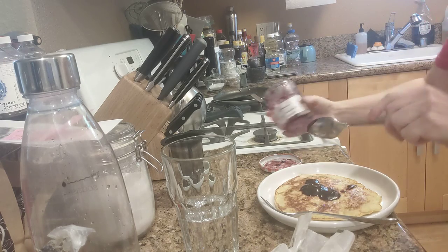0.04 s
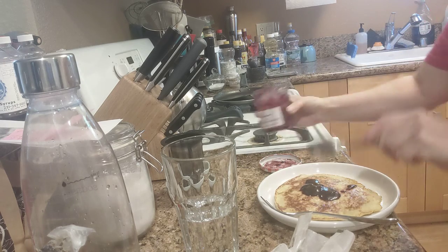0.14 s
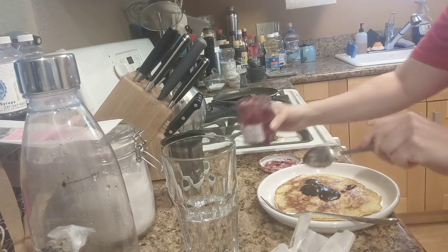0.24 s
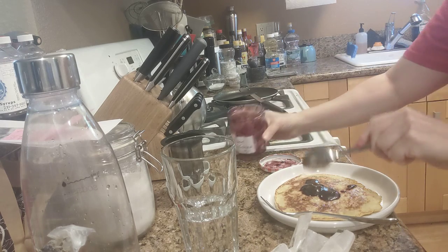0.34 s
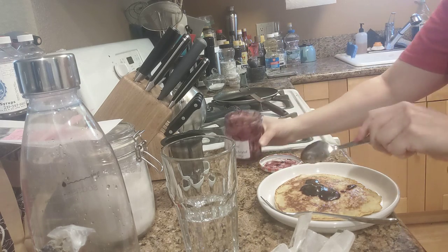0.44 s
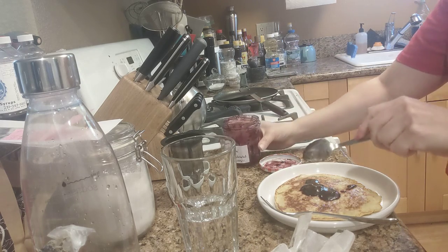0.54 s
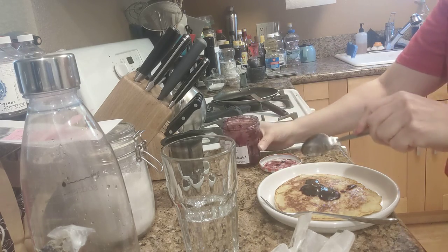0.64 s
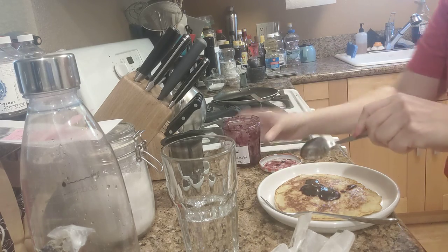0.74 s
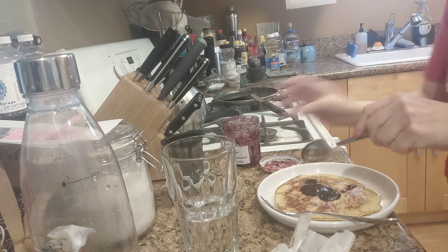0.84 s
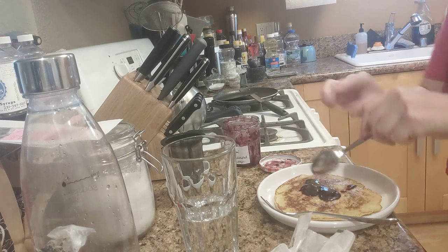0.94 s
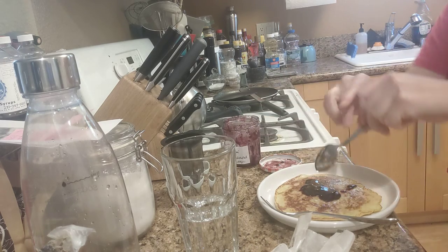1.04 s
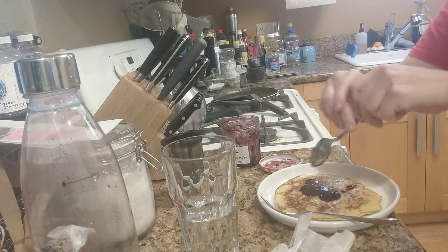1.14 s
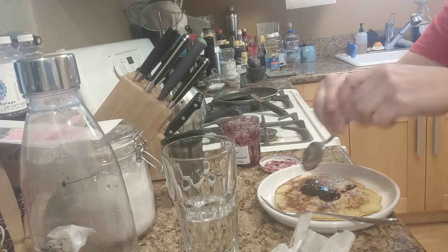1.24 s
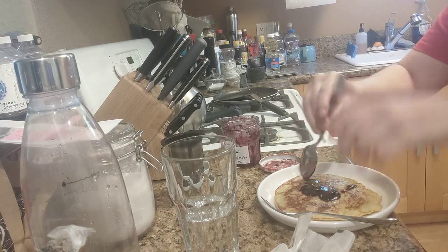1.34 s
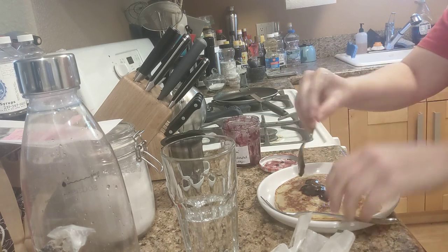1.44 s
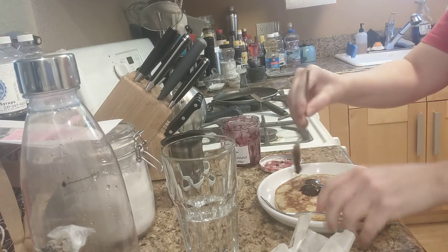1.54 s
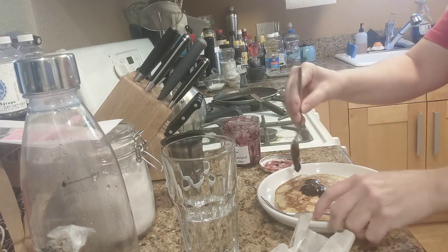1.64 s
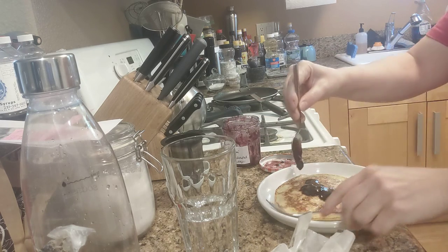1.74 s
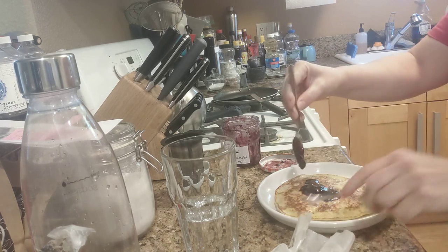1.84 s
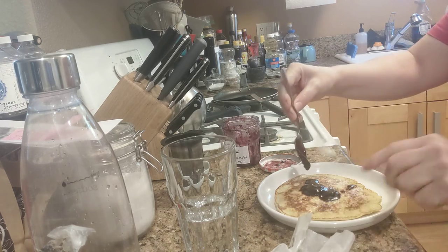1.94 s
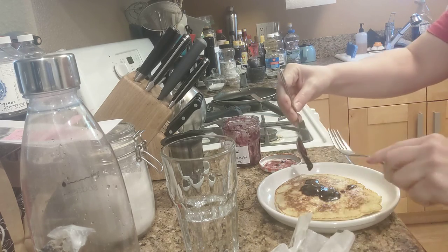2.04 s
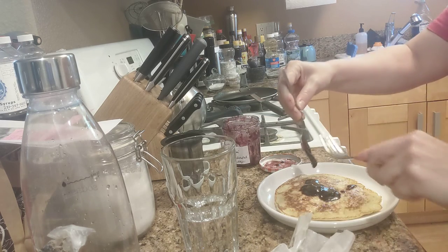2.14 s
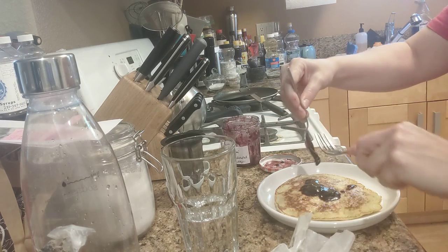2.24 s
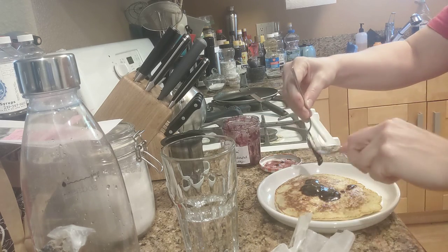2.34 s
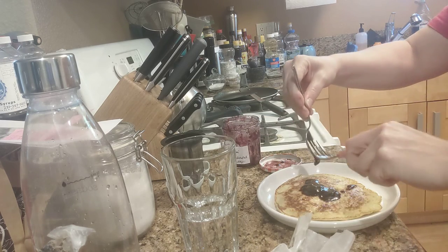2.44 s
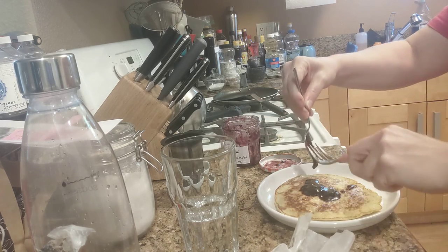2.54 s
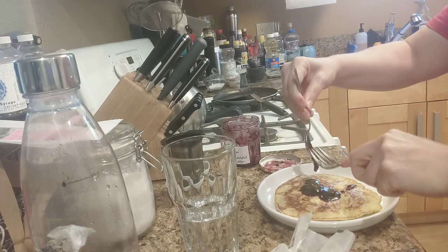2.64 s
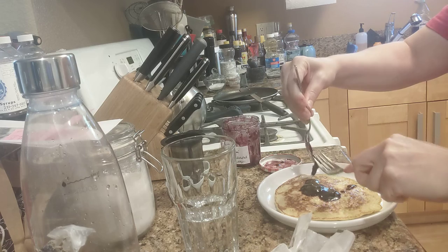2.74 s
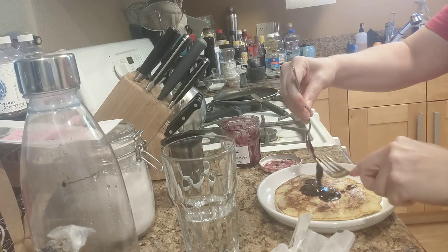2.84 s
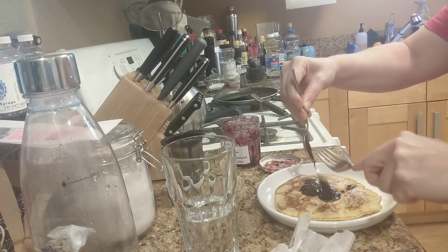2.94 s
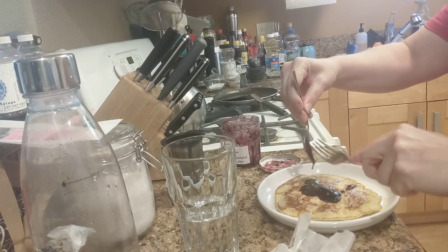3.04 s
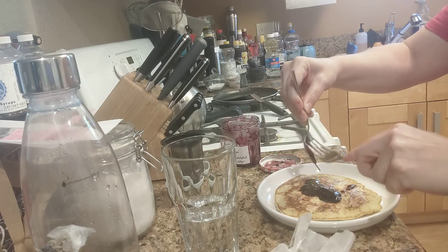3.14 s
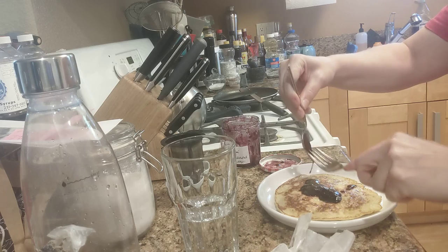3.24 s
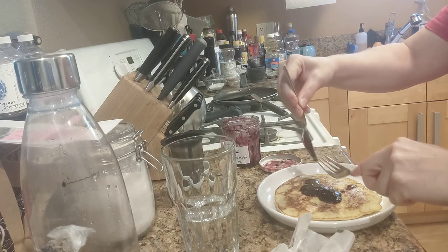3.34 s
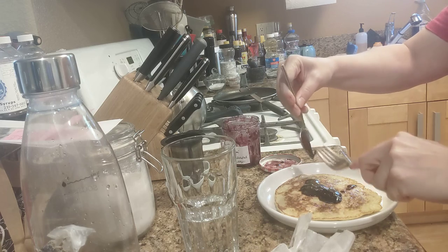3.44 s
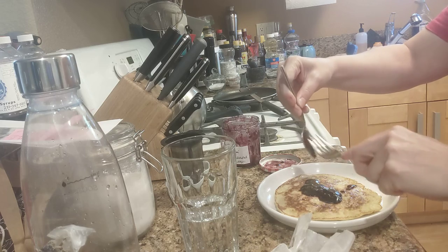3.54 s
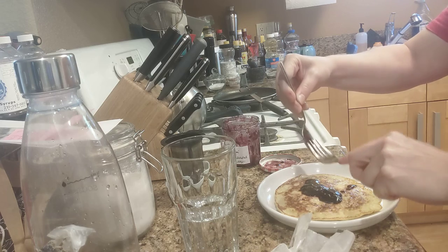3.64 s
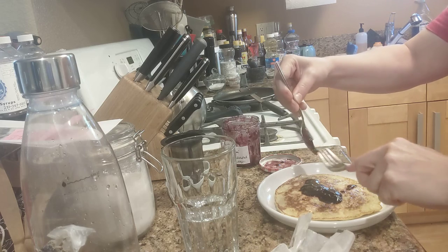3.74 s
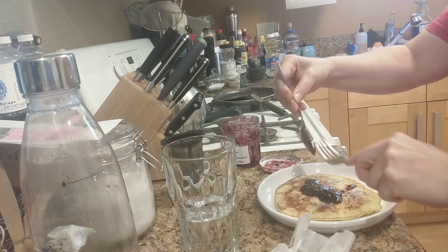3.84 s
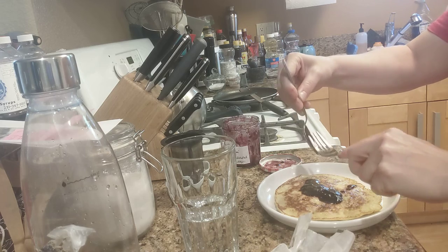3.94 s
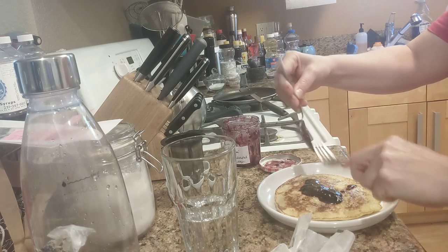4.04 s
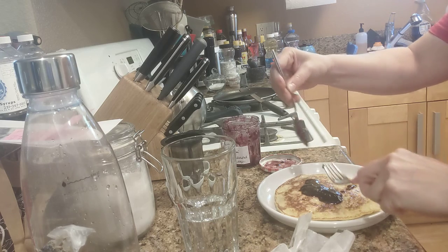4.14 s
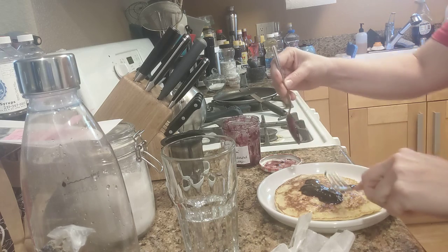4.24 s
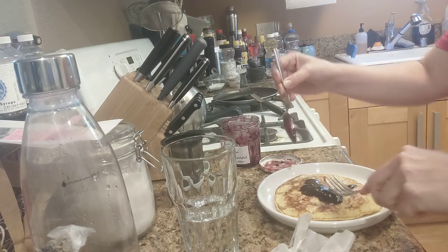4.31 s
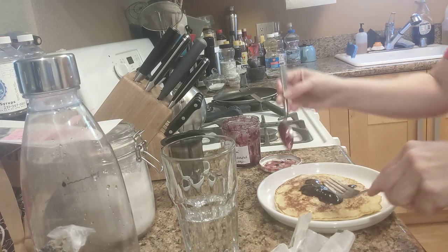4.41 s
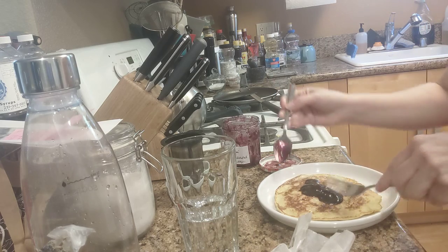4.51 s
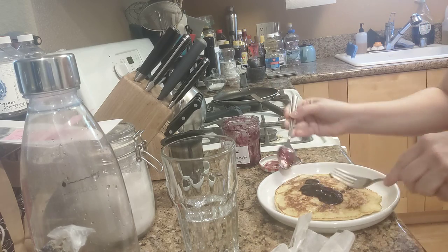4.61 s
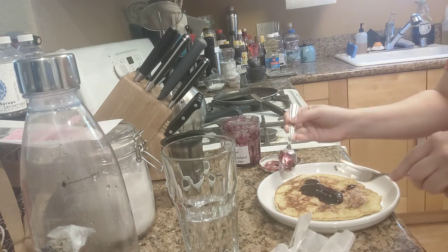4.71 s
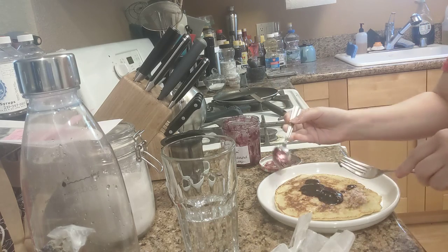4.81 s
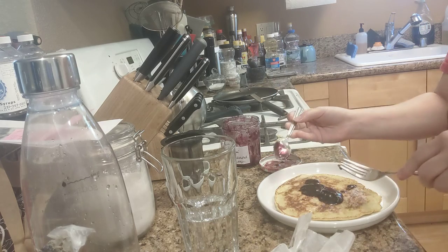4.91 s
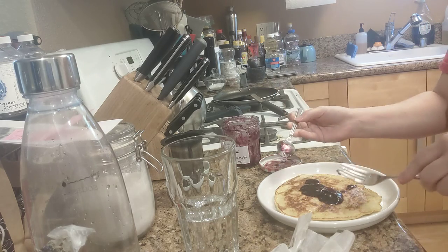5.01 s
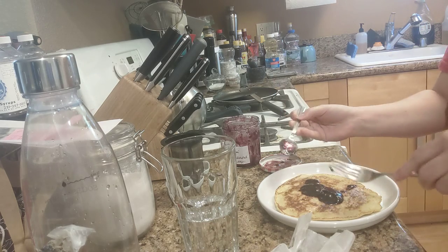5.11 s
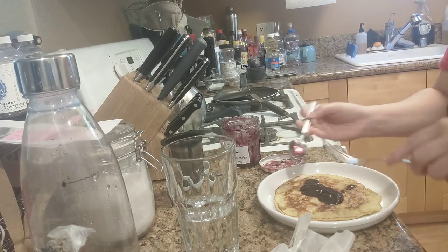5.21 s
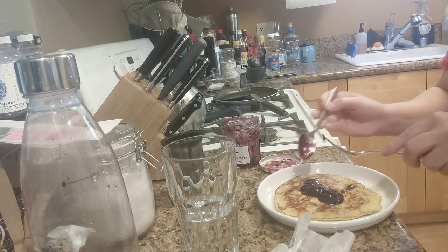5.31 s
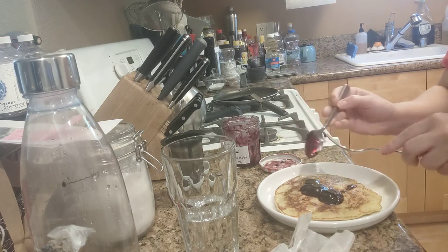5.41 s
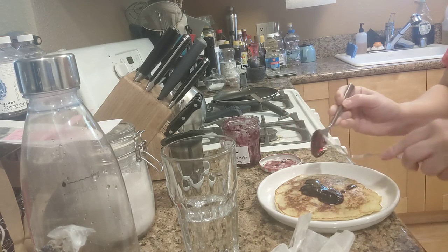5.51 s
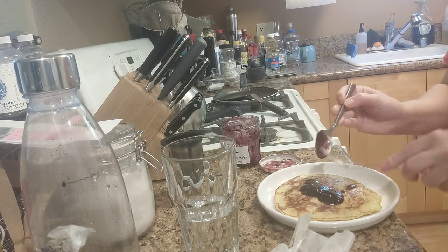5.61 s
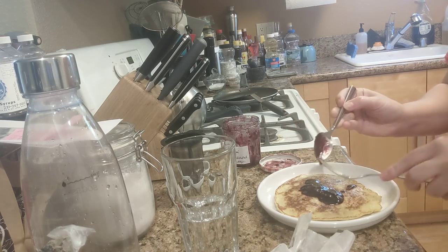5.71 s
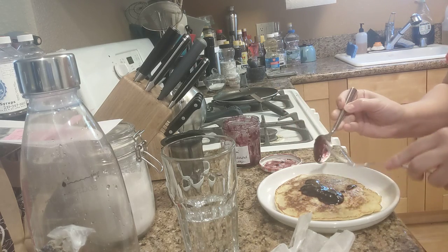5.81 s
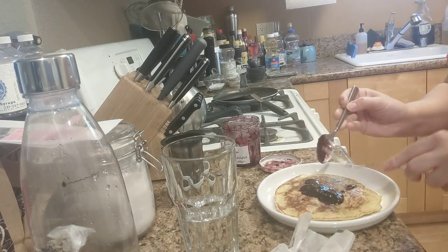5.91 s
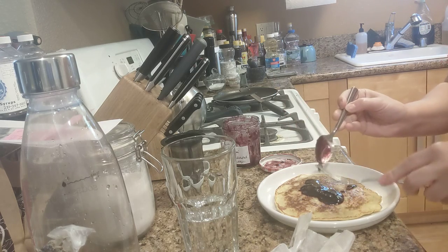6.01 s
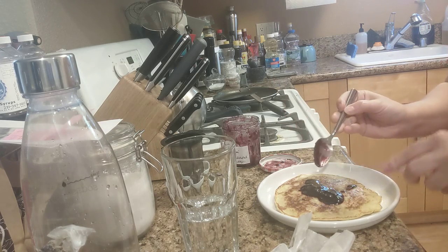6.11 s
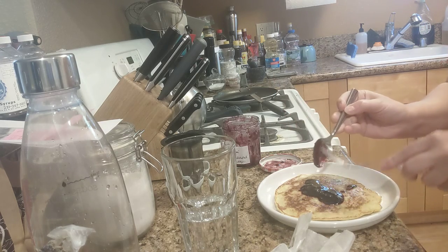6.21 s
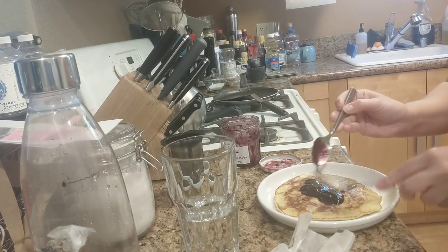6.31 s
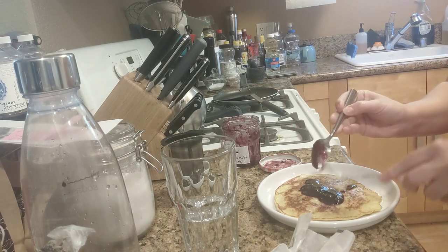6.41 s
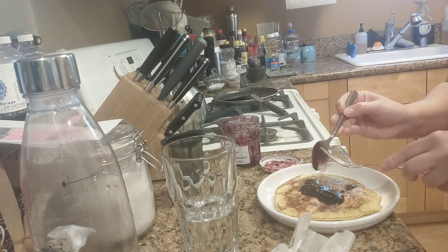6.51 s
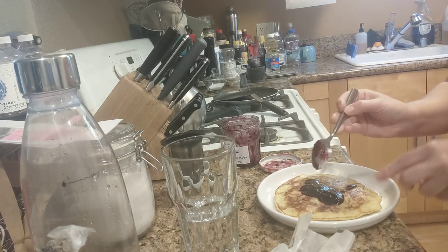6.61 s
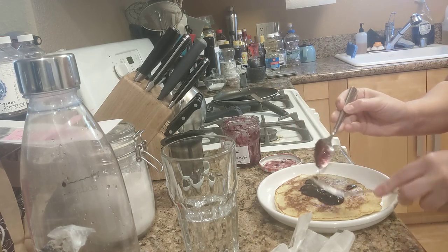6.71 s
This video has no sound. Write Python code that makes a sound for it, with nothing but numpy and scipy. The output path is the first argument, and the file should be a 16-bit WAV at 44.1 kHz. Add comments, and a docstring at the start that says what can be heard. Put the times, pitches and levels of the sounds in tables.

```python
"""A home kitchen, where a refrigerator hums over room noise and a low rumble. A full glass jar is set
down on a stone counter and rocks to rest, fingers tick lightly, and a fork is lifted off a ceramic dish.
Its tines then clink on a steel spoon and scrape jam off it, stroke after stroke. Impacts excite damped
normal modes; scraping drives the steel's modes by stick-slip friction. Glassware scatters the sound,
the room reverberates, and the left microphone port hears more treble than the right."""
import sys
import numpy as np
from scipy import signal
from scipy.fft import rfft, irfft, next_fast_len
from scipy.io import wavfile
from scipy.ndimage import uniform_filter1d, map_coordinates

SR = 44100
rng = np.random.default_rng(int(sys.argv[2]) if len(sys.argv) > 2 else 0)


def materialize(psi):
    """Save the field psi as 16-bit PCM at rate SR to the path in sys.argv[1].

    A 1-D psi becomes a single channel; in a 2-D psi each row is a channel.
    """
    bounded = np.clip(np.atleast_2d(psi).T, -1, 1)
    quanta = np.round(bounded * 32767).astype(np.int16)
    wavfile.write(sys.argv[1], SR, quanta)


N = 298248

# likeness of the room's sound at left and right: (frequency [Hz], correlation [-1 to 1])
COHERENCE = [(60, 1), (130, 0.34), (290, 0.42), (640, -0.23), (1410, 0.55), (3100, 0.13), (6820, -0.33),
             (15000, -0.16)]
# tines land or skip on the spoon: (time [s], peak level [dB], place [0 rim to 1 mid-bowl])
TINE_IMPACTS = [(2.4695, -33, 0.57), (2.502, -41, 0.22), (2.552, -51, 0.51), (2.57, -46.5, 1),
                (2.63, -51.5, .1), (2.6903, -60, .6), (2.713, -53.5, .9), (2.863, -47.5, 0.39),
                (2.8994, -48.5, 0.66), (3.2558, -34, 0.16), (3.3863, -49.5, 0.42), (3.4148, -51, .3),
                (3.452, -46, .1), (3.469, -50.5, 0.79), (3.711, -30.5, 0.15), (3.7543, -40.5, 0.99),
                (3.815, -39.5, 0.17), (3.862, -50, .6), (4.0444, -30.5, 0.44), (4.1796, -37.5, 0.58),
                (5.6251, -33, 0.32), (5.6695, -41, 0.16), (5.7404, -40, 0.44), (5.815, -52.5, 0.35),
                (5.9914, -30.5, 0.18), (6.1244, -51, 0.54), (6.3071, -28, 0.042), (6.348, -40, 0.21),
                (6.362, -41, .3), (6.642, -27.5, 0.038), (6.7301, -42.5, .3)]
# spoon and fork held in the fingers: (frequency [Hz], relative level [dB], t60 [s])
STEEL_MODES = [(2190, -17, 0.02), (2690, -3, 0.075), (3060, -6, 0.032), (4314, -3, 0.022),
               (4453, -2.5, 0.035), (5100, -11.5, 0.0069), (5710, 0, 0.046), (5883, 0.5, 0.03),
               (5990, -2.5, 0.09), (7250, -11.5, 0.12), (7910, 3, 0.023), (8550, -4.5, 0.052),
               (9180, 1, 0.022), (9860, -8, 0.011), (10560, -2, 0.014), (12020, -10.5, 0.044),
               (12070, -1, 0.014), (14410, -6, 0.016), (13300, -14.5, 0.0077), (14860, -28, 0.056)]
# bands of the top modes, upper bowl, lower bowl and handle: (low edge [Hz], high edge [Hz])
STEEL_BANDS = [(6500, 17000), (5200, 6500), (3700, 5200), (1500, 3700)]
TOUCH_S = .008  # rise time of a sliding contact


def amp(db):
    """Amplitude ratio of a level in dB."""
    return 10 ** (np.asarray(db) / 20)


def unit(x):
    """Normalisation to rms 1."""
    return x / np.sqrt(np.mean(x ** 2) + 1e-20)


def along(points, hz):
    """Interpolation of (frequency [Hz], value) points on a log axis."""
    f, values = np.transpose(points)
    return np.interp(np.log(hz + 1), np.log(f + 1), values)


def filtered(x, response):
    """Linear filtering: the spectrum of x times a complex frequency response."""
    size = next_fast_len(N + SR // 2)
    return irfft(rfft(x, size) * response(np.fft.rfftfreq(size, 1 / SR)), size)[..., :N]


def add(out, s, sound):
    """Superposition of a sound at time s."""
    part = out[..., round(s * SR):][..., :sound.shape[-1]]
    part += sound[..., :part.shape[-1]]


def coherence_angle(hz):
    """Half the angle whose cosine is the left-right correlation."""
    return np.arccos(np.clip(along(COHERENCE, hz), -1, 1)) / 2


def diffuse_noise(gain):
    """Partial coherence: independent mid and side noise make a stereo field of rms 1."""
    split = lambda hz: gain(hz) * [np.cos(coherence_angle(hz)), np.sin(coherence_angle(hz))]
    mid, side = filtered(rng.standard_normal((2, N)), split)
    return unit(np.array([mid + side, mid - side]))


def room_tone():
    """Stationary broadband noise, strongest in the bass."""
    # (frequency [Hz], relative spectral density [dB])
    spectrum = [(70, -5), (140, -11.5), (200, -4), (270, -12.5), (400, -13), (640, -18), (1030, -22.5),
                (1500, -29), (2150, -37), (4400, -36), (5000, -37), (9000, -41.5), (14400, -43.5),
                (16000, -45.5)]
    return amp(-64) * diffuse_noise(lambda hz: amp(along(spectrum, hz)) * (hz > 70))


def refrigerator():
    """Forced vibration: the motor gives slightly wavering tones and drives the room's low modes."""
    # (frequency [Hz], level [dB])
    motor_tones = [(59.2, -73), (318.5, -70), (533, -88), (1007, -92), (1067, -93), (3024, -104),
                   (3083, -102), (3320, -101), (3735, -102), (4506, -102), (4565, -100)]
    # (frequency [Hz], bandwidth [Hz], relative level [dB])
    room_modes = [(101.3, 8, -73), (118, 4, -79.5), (163.04, 7.9, -76), (194.3, 3, -67), (375.4, 7.3, -80)]
    t, hum = np.arange(N) / SR, np.zeros((2, N))
    for hz, db in motor_tones:
        waver = map_coordinates(rng.standard_normal(size=N // 4000), [t * 7])
        port_phase = coherence_angle(hz) * np.array([[1], [-1]])
        gain = np.sqrt(2) * amp(db + 1.5 * waver) / np.cos(port_phase)
        hum += gain * np.sin(2 * np.pi * hz * t + .5 * waver + port_phase)
    power = lambda f: sum(amp(db) ** 2 / width / (1 + ((f - hz) / width * 2) ** 4)
                          for hz, width, db in room_modes)
    return hum + amp(-67) * diffuse_noise(lambda f: np.sqrt(power(f)))


def rumble():
    """Amplitude modulation: noise below about 70 Hz slowly swells and sinks."""
    # (time [s], level [dB])
    swells = [(0.0, -72.5), (0.69, -69), (2.84, -72), (3.65, -69), (3.95, -63), (4.39, -59), (4.76, -65.5),
              (4.95, -61.5), (5.76, -71.5), (6.6, -64), (6.76, -68)]
    envelope = amp(np.interp(np.arange(N) / SR, *np.transpose(swells)))
    return envelope * diffuse_noise(lambda hz: (hz > 8) / (1 + (hz / 70) ** 6))


def strike(db, modes, tilt_db, scatter_db, crack_db, crack_hz, crack_t60, attack_s, spread_rad):
    """Impulse excitation: freely decaying modes plus the crack of the contact, scaled to peak at db."""
    hz, level, t60 = np.transpose(modes)[:, :, None]
    t = np.arange(SR // 2) / SR
    strength, phase = rng.standard_normal((2, len(modes), 1))
    decay = amp(level + tilt_db + scatter_db * strength - 60 * t / t60)
    ring = decay * np.sin(2 * np.pi * hz * t + spread_rad * phase)
    bright_noise = signal.lfilter([1, -.75], 1, rng.standard_normal(len(t)))
    lowpass = signal.butter(4, crack_hz, fs=SR)
    crack = amp(crack_db - 60 * t / crack_t60) * signal.lfilter(*lowpass, bright_noise)
    blow = (ring.sum(0) + crack) * (1 - np.exp(-t / attack_s))
    return amp(db) * blow / np.abs(blow).max()


def knocks(blows, modes, crack_db, attack_s):
    """Contact stiffness: harder blows reach the higher modes."""
    out, hz = np.zeros(N), np.array(modes)[:, :1]
    for s, db, hard_db in blows:
        tilt_db = hard_db * hz / (hz + 2000)
        add(out, s, strike(db, modes, tilt_db, scatter_db=1.5, crack_db=crack_db + hard_db,
                           crack_hz=4200, crack_t60=.016, attack_s=attack_s, spread_rad=.3))
    return filtered(out, lambda f: 1j * f / (1j * f + 140))  # small objects radiate little bass


def jar():
    """Damped free vibration: the jar rocks on the stone, and the jam deadens most of its modes."""
    # (time [s], level [dB], hardness [dB])
    blows = [(.6485, -5.5, 8.5), (.6838, -8, 9), (.6992, -15.5, 3.5), (.7075, -18, 10.5), (.7135, -24, 0.5),
             (.7612, -28.5, 16), (.7692, -18.5, -6.5), (.7735, -17.5, -12)]
    # jar and slab: (frequency [Hz], relative level [dB], t60 [s])
    modes = [(123, -27, 0.1), (369.4, -10.5, 0.044), (560, -10.5, 0.04), (825, -21, .3), (825, -2, 0.0464),
             (911, -6, 0.026), (1125, -5.5, .025), (1375, -8.5, 0.037), (1613, -6, .02), (1922, -25, 0.3),
             (2143, -7, .012), (3160, -4, 0.0076), (3860, -10, 0.0067), (5210, -34.5, .03), (6740, -49, .2),
             (6725, -52, .2), (7380, -41, .04), (11770, -47, 0.12), (14800, -46, .05)]
    return knocks(blows, modes, crack_db=-6, attack_s=.0008)


def ticks():
    """Non-resonant transients: fingers, jam and tines give short puffs of band-limited noise."""
    # (time [s], peak level [dB], low edge [Hz], high edge [Hz])
    touches = [(1.276, -69, 9000, 17000), (1.406, -65, 7000, 17000), (1.421, -58, 6500, 15800),
               (1.438, -78, 7000, 14000), (1.544, -60, 7000, 17600), (1.556, -58, 1930, 10600),
               (1.635, -72, 4000, 16000), (1.721, -65, 9000, 17000), (1.747, -65, 9000, 17000),
               (4.595, -43, 2170, 10800)]
    out, t = np.zeros(N), np.arange(SR // 50) / SR
    envelope = amp(-60 * t / .0073) * (1 - np.exp(-t / .00057))
    for s, db, lo_hz, hi_hz in touches:
        band = signal.butter(2, [lo_hz, hi_hz], "band", fs=SR)
        puff = signal.lfilter(*band, rng.standard_normal(len(t)) * envelope)
        add(out, s, amp(db) * puff / np.abs(puff).max())
    return out


def resonances(modes, damping):
    """Resonance broadening: the response of modes whose bandwidth a hand or a rubbing contact widens."""
    peaks = [(hz, damping * np.log(1000) / (np.pi * t60), db) for hz, db, t60 in modes]
    return lambda f: sum((-1) ** k * amp(db) * 1j * f * width / (hz * hz - f * f + 1j * f * width)
                         for k, (hz, width, db) in enumerate(peaks))


def stroke(first_db, swell_s, top_db, fade_db_per_s, growth=1):
    """Envelope of sliding friction: it sets in, swells to its top and fades as the contact lifts."""
    t = np.arange(SR // 2) / SR
    below_top_db = growth * (top_db - first_db) * np.clip(1 - t / swell_s, 0, 1)
    faded_db = fade_db_per_s * np.clip(t - swell_s, 0, None)
    return amp(top_db - below_top_db - faded_db) * np.clip(t / TOUCH_S, 0, 1)


def dish():
    """Impact and friction excite the same modes: the fork knocks the rim and barely grazes the glaze."""
    # (time [s], level [dB], hardness [dB])
    blows = [(1.816, -52, 37), (1.871, -28, 11), (1.911, -40.5, -16)]
    # (frequency [Hz], relative level [dB], t60 [s])
    modes = [(357, -1.5, 0.019), (578, 8, 0.016), (835, 2.5, 0.017), (1323, -2, 0.023), (1460, 1.5, 0.036),
             (2200, 0, 0.0098), (3192, -14.5, 0.037), (3096, -4, 0.012), (5300, -25, 0.027),
             (7400, -36, 0.071), (9510, -46, 0.2), (12100, -52, 0.27)]
    # (time [s], first level [dB], swell [s], top level [dB], fade [dB/s])
    slide = (1.83, -68, -0.07, -64, 900)
    body, pressure = resonances(modes, damping=2.5), np.zeros(N)
    drag = unit(filtered(rng.standard_normal(N), lambda f: body(f) * f / (f + 1500)))
    add(pressure, slide[0], stroke(*slide[1:]))  # with a negative swell it starts far into its fade
    return knocks(blows, modes, crack_db=-4, attack_s=.00058) + pressure * drag


def clinks():
    """Mode shapes: where the tines land sets how much the spoon's bowl and handle ring."""
    # upper bowl, lower bowl, handle: (gain struck at the rim [dB], gain struck mid-bowl [dB])
    place_gains = [(-12.5, 9), (7.5, -13), (-15, -25)]
    out, hz = np.zeros(N), np.array(STEEL_MODES)[:, :1]
    for s, db, place in TINE_IMPACTS:
        tilt_db = sum((lo < hz) * (hz < hi) * (rim + place * (mid - rim))
                      for (rim, mid), (lo, hi) in zip(place_gains, STEEL_BANDS[1:]))
        add(out, s, strike(db, STEEL_MODES, tilt_db, scatter_db=3.5, crack_db=3,
                           crack_hz=16800, crack_t60=.037, attack_s=.00049, spread_rad=.52))
    return out


def friction(slips_per_s=3000, spread_db=3, chatter_db=2.3, shift_db=5):
    """Stick-slip: tines move in tiny uneven jerks, and the moving contact favours changing modes."""
    chatter = amp(chatter_db * map_coordinates(rng.standard_normal(N // 300 + 4), [np.arange(N) / 300]))
    chance, size, direction = rng.random((3, N))
    jerks = (chance < slips_per_s / SR) * amp(-spread_db * np.log(size + 1e-9)) * np.sign(direction - .5)
    force = chatter * (unit(jerks) + 1.96 * rng.standard_normal(N))
    spectra = signal.stft(force, nperseg=256)[2]
    drift = uniform_filter1d(rng.standard_normal(spectra.shape), size=3, axis=0)  # smooth in frequency
    drift = uniform_filter1d(drift, size=20, axis=1)  # and in time
    return signal.istft(spectra * amp(shift_db * unit(drift)), nperseg=256)[1][:N]


def scrape(settle_db=-27.5, settle_db_per_s=300):
    """Frictional excitation: steel rings and rasps in each stroke and as tines settle after a clink."""
    # (time [s], first level [dB], swell [s], top level [dB], fade [dB/s],
    #  upper bowl gain [dB], lower bowl gain [dB], handle gain [dB], rasp over ring [dB])
    strokes = [(2.52, -77, 0.045, -67.5, 209, 5.5, -9, -5.5, -8.5),
               (2.695, -82, 0.034, -71, 176, 0, -12, -20, -7),
               (2.78, -77, 0.12, -59.5, 550, -4, -7, -17.5, -10),
               (3.30, -69, 0.15, -56, 450, -12, -12, -21.5, -17),
               (3.751, -62.5, 0.054, -57.5, 246, 6, -8.5, -14.5, -5.5),
               (4.11, -80, 0.06, -58, 332, 1.5, -5, -16, -19),
               (5.667, -60.5, 0.079, -54, 217, -4, -7, -23, -8),
               (6.019, -63, 0.042, -53, 264, -7, -10.5, -23.5, -8.5),
               (6.347, -58, 0.04, -50.5, 246, -9, -12, -23, -7.5),
               (6.69, -63.5, 0.046, -59.5, 500, -20.5, -5, -25, -2)]
    # growth with the swell: (upper bowl [dB/dB], lower bowl [dB/dB], handle [dB/dB])
    growths = [0.84, 2, 0.92]
    settling = [(s, db + settle_db, TOUCH_S, db + settle_db, settle_db_per_s, -23, -21, -23, -8.5)
                for s, db, _ in TINE_IMPACTS]
    rub = friction()
    ring_gains, rasp_gains, out = np.zeros((4, N)), np.zeros((4, N)), np.zeros(N)
    for start, *shape, upper_db, lower_db, handle_db, rasp_db in strokes + settling:
        parts = zip([0, upper_db, lower_db, handle_db], [1, *growths])
        gains = np.array([amp(db) * stroke(*shape, growth) for db, growth in parts])
        add(ring_gains, start, gains)
        add(rasp_gains, start, amp(rasp_db) * gains)
    for ring, rasp, (lo, hi) in zip(ring_gains, rasp_gains, STEEL_BANDS):
        body = resonances([mode for mode in STEEL_MODES if lo < mode[0] < hi], damping=3.24)
        band = lambda f: 1 / (1 + (lo / (f + 1)) ** 8) / (1 + (f / hi) ** 8)
        out += (filtered(ring * rub, body) + filtered(rasp * rub, band)) / np.std(filtered(rub, body))
    return out


def reverberation():
    """Absorption: in the room's stereo impulse response each frequency dies at its own rate."""
    # (frequency [Hz], t60 [s])
    decay_times = [(100, .5), (800, 0.37), (3000, 0.31), (8000, 0.19), (16000, 0.067)]
    hz, t, spectra = signal.stft(rng.standard_normal((2, SR // 2)), SR, nperseg=256)
    tail = signal.istft(spectra * amp(-60 * t / along(decay_times, hz)[:, None]), SR, nperseg=256)[1]
    # long waves reach both ports alike
    tail[1] += signal.lfilter(*signal.butter(1, 900, fs=SR), tail[0] - tail[1])
    tail = np.pad(tail, ((0, 0), (130, 0)))  # 3 ms of delay
    return tail / np.linalg.norm(tail[0])


def heard(x, left_db, near_db, wet_db, left_lag_s=.00008, hop=3000, count=6):
    """Multipath propagation: direct sound, right port first, then scatter off glassware and the room."""
    delays = lambda hz: np.exp(-1j * np.pi * hz * left_lag_s * np.array([[1], [-1]]))
    sides = amp([[left_db / 2], [-left_db / 2]])
    out = sides * filtered(np.array([x, x]), delays)
    t = np.arange(SR // 40) / SR
    paths = amp(wet_db) * np.array([reverberation() for _ in range(count)])
    scatter = np.diff(rng.standard_normal((count, 2, len(t) + 1))) * amp(-60 * t / .025) * (t > .0005)
    paths[..., :len(t)] += sides * amp(near_db) * scatter / np.linalg.norm(scatter[0, 0])
    # hands and objects move, so each set of paths fades into the next
    window, padded = np.hanning(2 * hop), np.pad(x, (0, 2 * hop))
    for start in range(0, N, hop):
        piece = window * padded[start:start + 2 * hop]
        if np.abs(piece).max() > 1e-6:
            add(out, start / SR, signal.fftconvolve(piece[None], paths[start // hop % count], axes=1))
    return out


def scene():
    """Superposition of all sources, each contact sound arriving by its own paths."""
    contacts = heard(jar(), left_db=3.5, near_db=0, wet_db=-6, left_lag_s=.00007)
    contacts += heard(dish(), left_db=2.5, near_db=3, wet_db=-2, left_lag_s=.00009)
    contacts += heard(clinks() + scrape(), left_db=-.06, near_db=-6.5, wet_db=-10)
    contacts += heard(ticks(), left_db=6.5, near_db=-22, wet_db=3.5)
    return room_tone() + refrigerator() + rumble() + contacts


def record(dry):
    """Comb filtering by a surface near the microphone, with unequal ports and a band limit."""
    # (frequency [Hz], left over right [dB])
    imbalance = [(60, 1), (180, 0.5), (550, 3.5), (1650, 5.5), (4970, 8.5), (15000, 10)]
    ripple_spacing_hz, top_hz = 1945, 15900
    ports = lambda hz: amp(along(imbalance, hz) / 2 * np.array([[1], [-1]]))
    reflection = lambda hz: .19 * hz ** 2 / (hz ** 2 + 4000 ** 2)  # mostly treble
    ripple = lambda hz: 1 + reflection(hz) * np.exp(-2j * np.pi * hz / ripple_spacing_hz)
    return filtered(dry, lambda hz: ports(hz) * ripple(hz) / (1 + (hz / top_hz) ** 120))


dry = scene()
out = record(dry)
materialize(out)
```